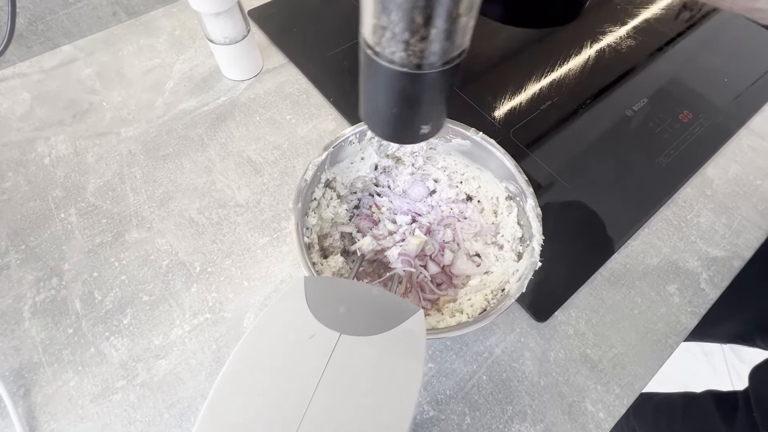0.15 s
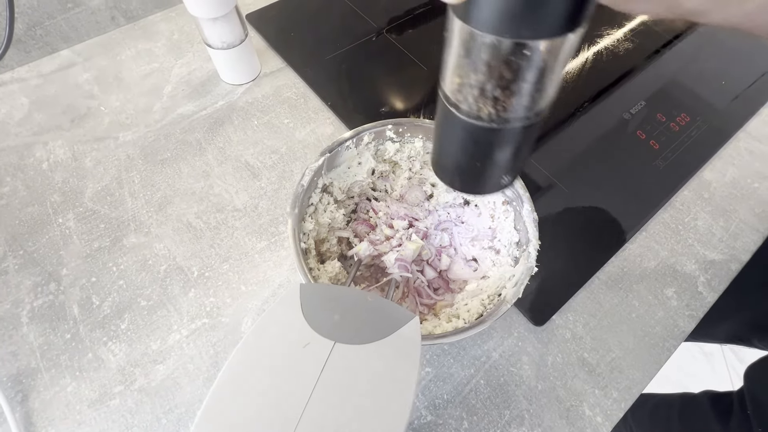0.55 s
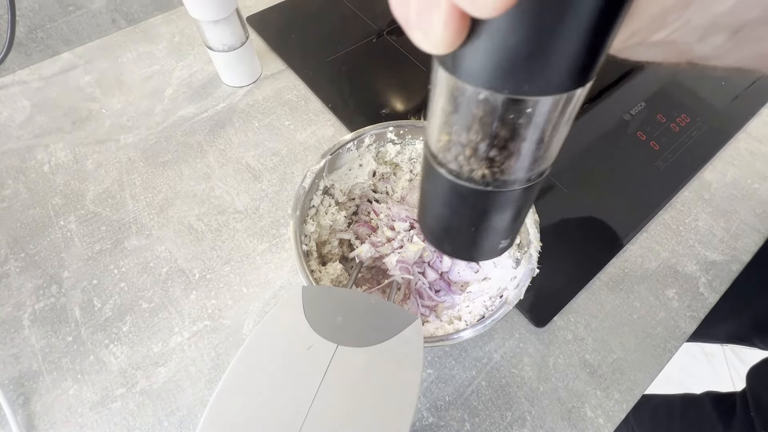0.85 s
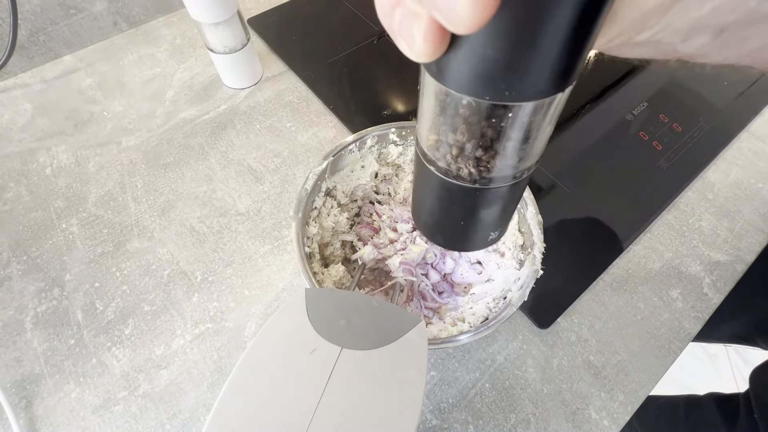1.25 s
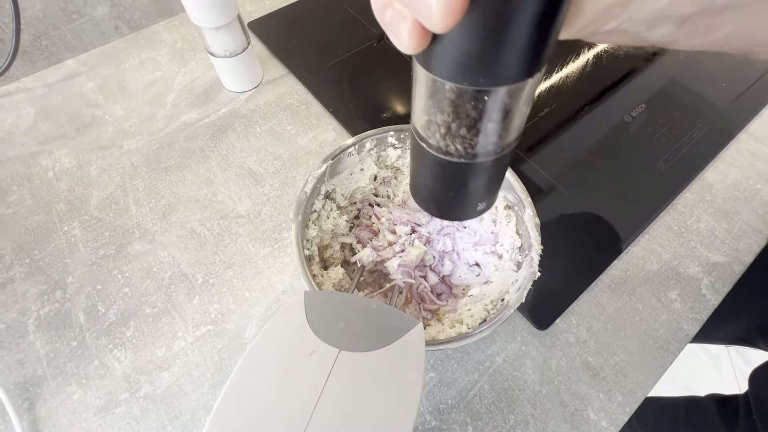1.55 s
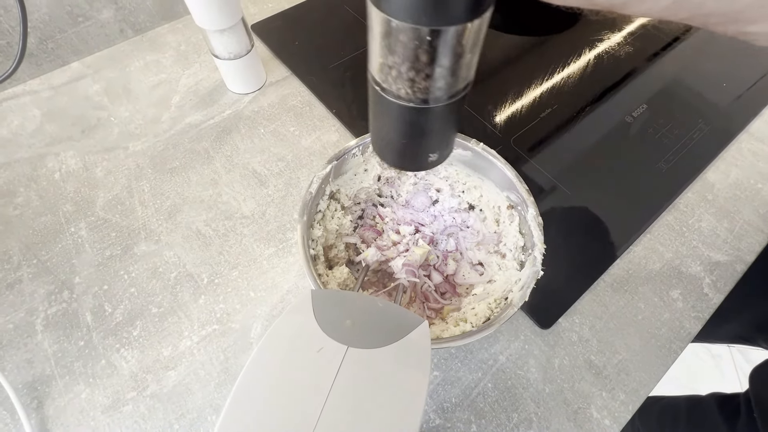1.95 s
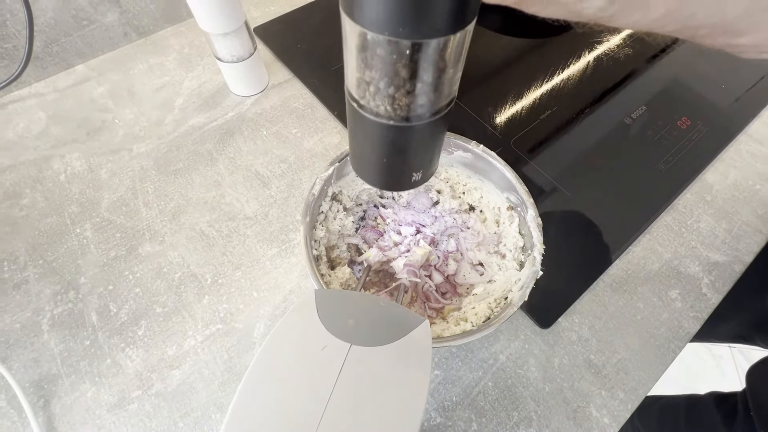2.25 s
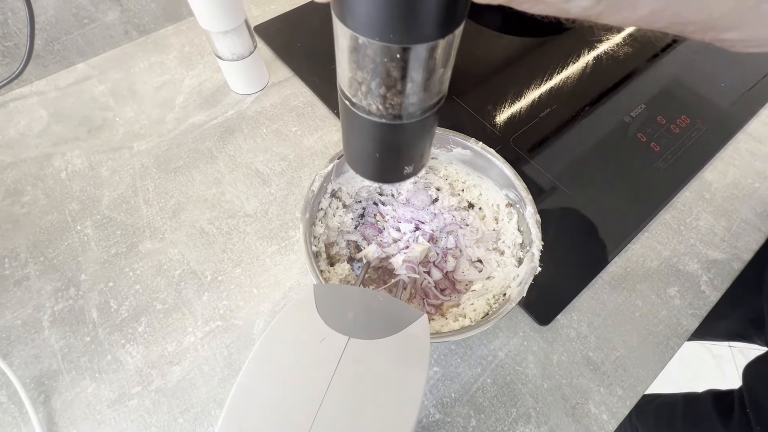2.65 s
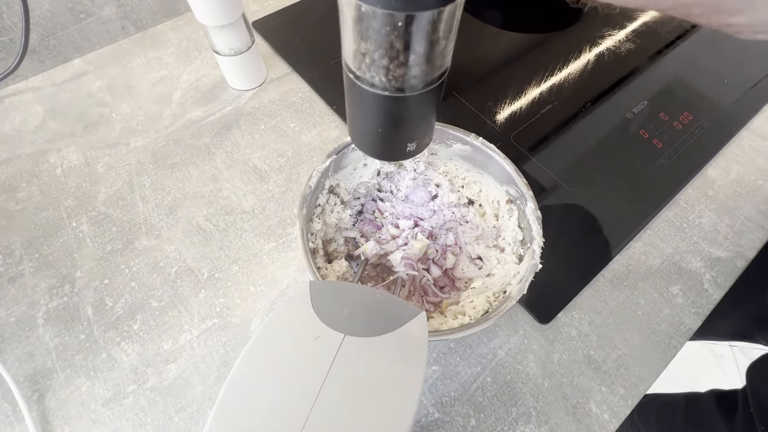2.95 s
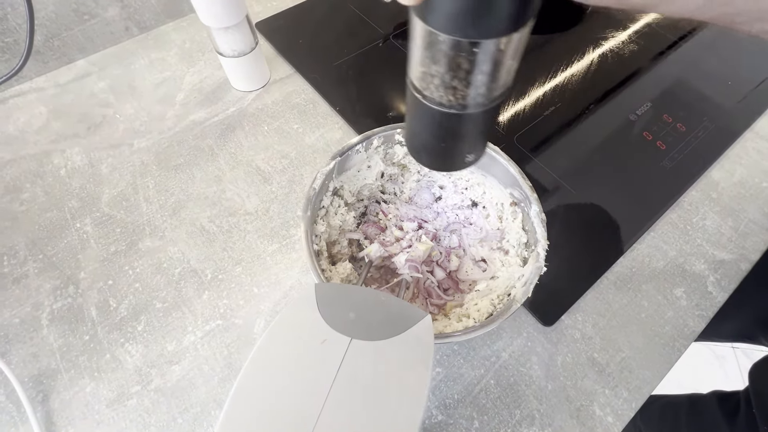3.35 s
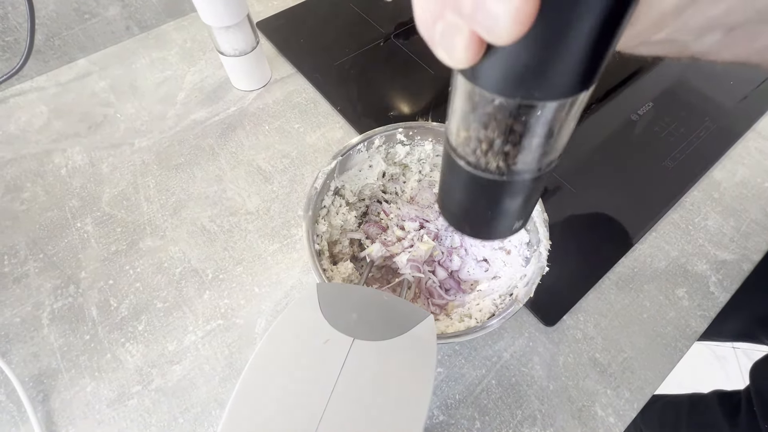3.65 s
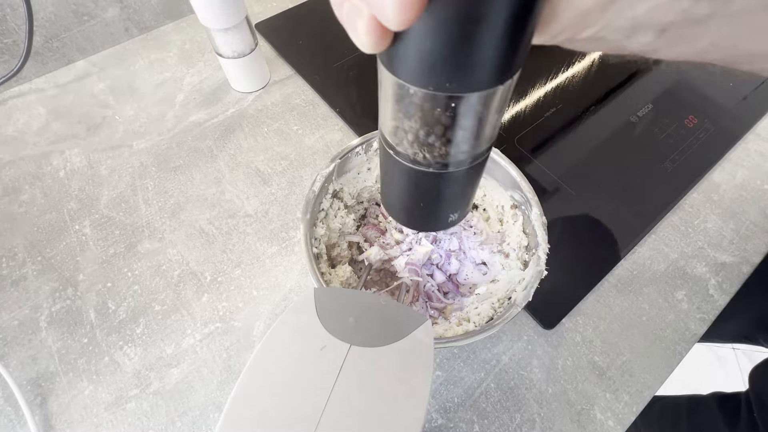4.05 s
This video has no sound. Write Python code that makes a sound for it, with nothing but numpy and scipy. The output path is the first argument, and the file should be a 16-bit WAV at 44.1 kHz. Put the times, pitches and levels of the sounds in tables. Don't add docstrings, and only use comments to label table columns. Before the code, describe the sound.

A battery pepper mill grinds close by, its motor whining and sagging under hard corns, with dry rattling hiss and sharp cracks.

```python
import sys
import numpy as np
from scipy import signal
from scipy.fft import rfft, irfft, next_fast_len
from scipy.io import wavfile
from scipy.ndimage import uniform_filter1d, map_coordinates

SR = 44100
rng = np.random.default_rng(int(sys.argv[2]) if len(sys.argv) > 2 else 0)


def to_linear_factor(level_db):
    exponent = np.asarray(level_db, float) / 20
    return 10 ** exponent


def transcribe(signal):
    frames = np.atleast_2d(signal).T
    limited = np.clip(frames, -1, 1)
    pcm = np.round(limited * 32767).astype(np.int16)
    wavfile.write(sys.argv[1], SR, pcm)


N = 185069

FREE_HZ = 185.7
GEAR_EDGE_S = .03


def unit(x):
    return x / np.sqrt(np.mean(x ** 2) + 1e-20)


def along(points, hz):
    f, v = np.transpose(points)
    return np.interp(np.log(hz + 1), np.log(f + 1), v)


def curves(rows):
    s, *cols = np.transpose(rows)
    return [np.interp(np.arange(N) / SR, s, c) for c in cols]


def wobble(rate):
    knots = rng.standard_normal(int(N * rate / SR) + 4)
    return map_coordinates(knots, [np.arange(N) * rate / SR])


def held(rows, edge_s):
    t = np.arange(N) / SR

    def ramp(u):
        return np.sin(np.pi / 2 * np.clip(u / edge_s + .5, 0, 1)) ** 2

    return sum(to_linear_factor(np.array(db)[:, None]) * ramp(t - s) * ramp(s + length - t) for s, length, *db in rows)


def filtered(x, response):
    m = next_fast_len(N + SR // 4)
    return irfft(rfft(x, m) * response(np.fft.rfftfreq(m, 1 / SR)), m)[..., :N]


def coloured(x, spectrum):
    return filtered(x, lambda hz: to_linear_factor(along(spectrum, hz)))


def modes(table):
    return lambda f: sum((-1) ** k * to_linear_factor(db) * 1j * f * w / (c * c - f * f + 1j * f * w)
                         for k, (c, w, db) in enumerate(table))


def passing(hz, mode):
    centre, width, db = mode
    return to_linear_factor(db) / (1 + ((hz - centre) / width) ** 2)


def steady(x):
    return x / np.sqrt(np.abs(uniform_filter1d(x[0] ** 2, size=7000)) + 1e-20)


def speed():
    # (lowest speed at [s], sag [Hz], squeeze [s], release [s])
    hard_corns = [(-.022, 39.7, .1, 0.38), (0.039, 2.16, 0.03, 0.035), (.265, 17.7, 0.063, 0.13),
                  (0.372, 4, 0.04, 0.063), (0.611, 18.6, .11, 0.17), (1.01, 12.6, .16, 0.38),
                  (1.286, 10.8, .041, .15), (1.57, 5.3, 0.029, 0.035), (1.639, 22.5, .12, 0.15),
                  (1.795, 11.1, 0.087, 0.087), (1.92, 15.8, 0.061, 0.38), (2.172, 36, .12, 0.099),
                  (2.446, 10.6, .1, 0.12), (2.68, 24.8, 0.093, 0.095), (2.9, 6, 0.37, 0.55),
                  (3.442, 20.6, .12, 0.048), (3.572, 12.3, .13, 0.17), (4.106, 9.6, .17, 0.23)]
    inertia_s = 0.069
    t = np.arange(N) / SR
    sag = sum(hz * np.exp(-((t - s) / np.where(t < s, squeeze, release)) ** 2)
              for s, hz, squeeze, release in hard_corns)
    return FREE_HZ - sag, sag + inertia_s * SR * np.gradient(sag)


def order(k, angle, gain, flutter_db):
    flutter = to_linear_factor(flutter_db * wobble(25.11))
    return np.sqrt(2) * gain * flutter * np.sin(k * angle + 2 * np.pi * rng.random())


def motor(angle, shaft_hz):
    # (multiple of shaft speed, level [dB])
    shaft_orders = [(2, -68), (4, -65), (8, -55), (9.54, -48.5), (10, -57), (12.72, -58)]
    # (frequency [Hz], level [dB per Hz])
    rumble_colour = [(150, -42), (210, -7.5), (300, -2.5), (420, -5.5), (600, -22)]
    sag = FREE_HZ - shaft_hz
    grip_db = -8.5 * np.clip(1 - np.arange(N) / SR / 0.77, 0, 1) ** .5
    drag_db = 0.61 * np.clip(168 - shaft_hz, 0, None)
    racing_db = .5 * np.clip(shaft_hz - 177, 0, None)
    unbalance = order(1, angle, to_linear_factor(-51.5 - 0.35 * sag + grip_db), .6)
    poles = order(3, angle, to_linear_factor(-48 - .44 * np.clip(sag - 10.7, 0, None)), 1.4)
    hum = sum(order(k, angle, to_linear_factor(db + (-drag_db if k > 2 else grip_db) - racing_db), 2.1)
              for k, db in shaft_orders)
    rumble_gain = to_linear_factor(0.17 * (shaft_hz - 168.5) - 61.0 + grip_db)
    rumble = rumble_gain * unit(coloured(rng.standard_normal(N), rumble_colour))
    return unbalance + poles + hum + rumble


def body_tones(angle, shaft_hz):
    # (frequency [Hz], width [Hz], level [dB])
    cap_mode = (905, 26, -48)
    collar_mode = (1395, 17, -49)
    wall_mode = (1920, 50, -51)
    cap = sum(order(k, angle, passing(k * shaft_hz, cap_mode) * to_linear_factor(1.5 * wobble(6)), 3.5) for k in (5, 6))
    collar = order(8, angle, passing(8 * shaft_hz, collar_mode), 3.5)
    wall = sum(order(k, angle, passing(k * shaft_hz, wall_mode), 4) for k in (10, 11, 12, 13))
    return cap + collar + wall


def pinion(angle, shaft_hz):
    # (start [s], length [s], level [dB])
    whine_notes = [(-.05, .3, -33), (.25, .11, -35), (.36, .07, -40), (.52, .12, -40), (.8, .11, -47),
                   (1.24, .05, -44), (1.54, .045, -38), (1.585, .17, -35), (1.755, .11, -49),
                   (1.87, .1, -39), (1.97, .05, -34.5), (2.02, .065, -28.5), (2.1, .15, -35.5),
                   (2.36, .1, -46), (2.52, .055, -44), (2.575, .04, -38), (2.615, .055, -33.5),
                   (2.67, .06, -36.5), (3.26, .06, -49), (3.362, .04, -36.5), (3.402, .042, -33.5)]
    # (start [s], length [s], 2nd overtone [dB], 3rd overtone [dB], 4th overtone [dB])
    jam_notes = [
        (-.05, .25, -56, -45, -50),
        (.2, .17, -56, -46, -48),
        (2.03, .07, -52, -50, -35),
        (2.1, .085, -38, -35, -31.5),
        (2.62, .06, -41, -58, -47),
        (3.365, .07, -43, -58, -50),
    ]
    # (frequency [Hz], width [Hz], level over the 4th [dB])
    rim_mode = (6750, 110, -3)
    idle_db = -53
    whine = order(9, angle, to_linear_factor(idle_db) + held(whine_notes, GEAR_EDGE_S)[0], 1.1)
    second, third, fourth = held(jam_notes, GEAR_EDGE_S)
    fifth = fourth * passing(45 * shaft_hz, rim_mode)
    overtones = ((18, second), (27, third), (36, fourth), (45, fifth))
    return whine + sum(order(k, angle, gain, 1.5) for k, gain in overtones)


def planet_gears(angle):
    # (start [s], length [s], level [dB])
    tight_meshes = [(.42, .12, -50), (.58, .14, -52), (.85, .33, -53), (1.3, .25, -49), (1.57, .2, -51),
                    (1.8, .25, -49), (2.33, .13, -42), (2.48, .15, -46), (3.5, .13, -54)]
    return order(6.36, angle, to_linear_factor(-60) + held(tight_meshes, GEAR_EDGE_S)[0], 3.5)


def flaws(angle):
    count = 128
    place, knots = angle * count / (2 * np.pi), np.arange(count)
    a, b, c, d = (np.interp(place, knots, row, period=count) for row in rng.standard_normal((4, count)))
    turn = 1.5 * wobble(5)
    return unit(np.array([a, b]) * np.cos(turn) + np.array([c, d]) * np.sin(turn))


def grit(load, per_s, share, angle):
    flaw_share = .055
    impacts = unit(rng.standard_normal((2, N)) * (rng.random((2, N)) < per_s / SR))
    share = np.clip(share, 0, 1 - flaw_share)
    friction = np.sqrt(1 - flaw_share - share) * rng.standard_normal((2, N))
    smooth = friction + np.sqrt(flaw_share) * flaws(angle)
    return load * to_linear_factor(0.67 * wobble(20) + 0.53 * wobble(60)) * (np.sqrt(share) * impacts + smooth)


def patchy(x, depth_db, peaks=()):
    hz, s, z = signal.stft(x, SR, nperseg=512)
    field = uniform_filter1d(rng.standard_normal(z.shape[1:]), size=4, axis=0)
    field = uniform_filter1d(field, size=36, axis=1)
    frame = np.minimum((s * SR).astype(int), N - 1)
    lift = 1 + sum(to_linear_factor(db[frame]) / (1 + ((hz[:, None] - centre[frame]) / width) ** 2)
                   for centre, width, db in peaks)
    return signal.istft(z * lift * to_linear_factor(depth_db * unit(field)), nperseg=512)[1][:, :N]


def ringing(x, spectrum):
    # (frequency [Hz], width [Hz], lift [dB])
    narrow_modes = [(2000, 48, -9.5), (2310, 125, -10), (3350, 54, -8), (3830, 51, -10), (6700, 41, -2),
                    (7330, 90, -13), (7430, 100, -6), (8110, 71, 0), (8890, 160, -2), (9780, 130, -0.5),
                    (10700, 350, -10)]

    def ridges(f):
        return 1 + sum(to_linear_factor(db) / (1 + ((f - hz) / width) ** 2) for hz, width, db in narrow_modes)

    return steady(filtered(x, lambda f: to_linear_factor(along(spectrum, f)) * ridges(f)))


def grind(angle, shaft_hz, torque):
    load_beats = [(.265, .08), (1, .14), (3, .12), (6.36, .13), (9, .1)]
    # (time [s], level [dB])
    corn_feed = [(0.0, -36.5), (0.24, -37.5), (0.38, -43.5), (1.52, -38.5), (1.54, -38.5), (1.82, -41),
                 (2.1, -37.5), (2.3, -43.5), (2.65, -37.5), (2.76, -43.5), (3.22, -43), (3.41, -38),
                 (3.53, -44), (3.58, -40), (3.75, -46.5), (4.01, -37.5), (4.17, -41), (4.2, -38)]
    # (start [s], length [s], extra level [dB])
    hard_bites = [(.52, 0.068, -9), (.83, 0.28, -10), (1.21, 0.071, -8), (1.54, 0.028, -14),
                  (2.05, .14, -21), (2.38, 0.067, -4.5), (2.53, 0.16, -15), (3.28, 0.052, -29)]
    # (time [s], lower ring [Hz], upper over lower [dB], high over low hiss [dB], rim ring [dB])
    hand_path = [(0, 5350, -1, -17, 0), (.3, 5460, 7, -13, 0), (.45, 5160, -6, -8, 2),
                 (.62, 5520, 13, 10, 0), (.8, 4582, -11, 11, -15), (1, 4752, -6, 4, -15),
                 (1.25, 5006, -2, 11, -12), (1.45, 5195, -12, 11, -10), (1.68, 5360, -8, -1, 1),
                 (1.9, 5300, -9, -5, 7), (2.2, 5090, -12, -4, 3.5), (2.6, 5000, 2, -3, 1),
                 (3.0, 5071, -9, -4, -7), (3.3, 5208, -8, 1, 5), (3.55, 4956, -12, 19, 0),
                 (3.85, 4950, -20, 7, -15), (4.05, 5000, -29, -4, -3)]
    # (frequency [Hz], level [dB per Hz])
    housing_colour = [(240, -86), (400, -13.5), (513, -12.5), (581, -9.5), (669, -4), (802, -1.5),
                      (987, -5.5), (1390, 4), (1540, 0), (1880, 5), (2630, -24.5), (2900, -12), (3770, -21),
                      (6380, -120)]
    shell_colour = [(1350, -102), (2300, -4), (2660, -8.5), (2960, -5.5), (3570, -4), (4600, -0.5),
                    (5980, -7.5), (10100, -120)]
    hopper_colour = [(2290, -37), (3900, -3), (5080, 3), (5900, 1.5), (6500, -3.5), (6720, -7), (6850, -38),
                     (7200, -16.5), (9360, -49), (15800, -120)]
    burr_colour = [(6500, -52), (6900, 0.5), (7100, -5.5), (8300, 0.5), (9090, 1.5), (11100, -0.5),
                   (11700, -1.5), (13000, -1), (14500, -5.5), (15050, -6.5), (15700, -29)]

    bite_db = 20 * np.log10(1 + held(hard_bites, GEAR_EDGE_S)[0])
    press_db = curves(corn_feed)[0] + 40 + 0.13 * (torque - 17) + bite_db
    lower_hz, upper_db, hiss_db, rim_db = curves(hand_path)
    upper_hz = 5900 + 0.089 * (lower_hz - lower_hz.mean())
    pulse = np.exp(sum(depth * np.sin(k * angle) for k, depth in load_beats))
    stutter_db = .6 * wobble(350)
    load = pulse * to_linear_factor(0.36 * wobble(16) + 0.23 * wobble(70) + stutter_db)
    teeth = patchy(grit(load, 900, share=0.12, angle=angle), depth_db=1.3)
    # (Hz, width Hz, dB)
    peaks = [(lower_hz, 700, 7.0 - upper_db / 2),
             (upper_hz, 400, 7.0 + upper_db / 2),
             (np.full(N, 9250), 450, -8.5 - hiss_db / 2),
             (np.full(N, 11000), 450, hiss_db / 2),
             (np.full(N, 6440), 300, rim_db + 11.0)]
    crumbs = patchy(grit(load, 2500, share=0.05, angle=angle), depth_db=2.5, peaks=peaks)

    stall_db = 0.19 * np.clip(163 - shaft_hz, 0, None)
    housing = to_linear_factor(-37.0 + 0.31 * press_db - stall_db) * ringing(teeth, housing_colour)
    shell = to_linear_factor(-37.0 + 0.26 * press_db - 0.052 * upper_db) * ringing(teeth, shell_colour)
    hopper = to_linear_factor(-30.5 + 0.49 * press_db + 0.075 * upper_db) * ringing(crumbs, hopper_colour)
    burr = to_linear_factor(-39.0 + 0.79 * press_db) * ringing(crumbs, burr_colour)
    return housing + shell + hopper + burr


def scrapes():
    # (start [s], length [s], frequency [Hz], level [dB])
    scrape_notes = [(0, 0.044, 890, -41), (0.098, .19, 905, -52), (.11, .09, 1980, -50),
                    (0.441, .3, 1850, -42.5), (.62, 0.054, 2000, -40), (1.54, 0.029, 6086, -29),
                    (1.62, 0.097, 6270, -33.5), (2.046, 0.024, 5900, -34), (2.11, 0.1, 5944, -29.5),
                    (2.197, 0.14, 5895, -33), (2.382, 0.34, 5900, -40), (2.754, 0.51, 5950, -38),
                    (2.869, 0.0699, 2300, -45), (3.264, 0.081, 5227, -30.5), (3.891, .2, 1745, -41),
                    (4.131, .05, 1765, -47), (3.986, 0.17, 5108, -35)]
    width_hz, full_width_at_hz = 220, 6500
    a, b, n = wobble(width_hz), wobble(width_hz), np.arange(N)
    out = np.zeros(N)
    for s, length, hz, db in scrape_notes:
        place = n * (hz / full_width_at_hz) ** .7
        phase = 2 * np.pi * hz * n / SR
        ring = np.interp(place, n, a) * np.cos(phase) + np.interp(place, n, b) * np.sin(phase)
        out += held([(s, length, db)], 0.05)[0] * ring
    return out


def kitchen_hum():
    # (frequency [Hz], level [dB per Hz])
    room_colour = [(12, -47), (20, -49), (57, 5), (86, -7), (150, 3.5), (304, -11), (348, -36), (400, 3.5),
                   (520, 3.5), (880, -120)]
    return to_linear_factor(-64.5) * unit(coloured(rng.standard_normal((2, N)), room_colour))


def ring_gear(angle):
    # (start [s], length [s], level [dB])
    drum_notes = [
        (.45, .06, -48),
        (.65, 0.065, -45),
        (2.5, .13, -46),
        (3.25, 0.082, -44),
    ]
    return order(8, angle, held(drum_notes, GEAR_EDGE_S)[0], 2)


def cracks():
    # (time [s], peak [dB], knock [dB])
    corn_splits = [(.55, -14, -34), (1.257, -21, -32), (1.277, -24.5, 9), (1.393, -29, 9.5),
                   (1.462, -26, -25), (1.555, -13, -18), (1.625, -20, -25), (2.057, -13, -30),
                   (2.065, -14, -25), (2.161, -14, -25), (2.169, -9.5, -25), (2.191, -16, -30),
                   (2.212, -17, -25), (2.64, -23, -26), (2.715, -28, 2), (2.911, -24, -25),
                   (3.013, -19, -25), (3.296, -24, -25), (3.31, -24, -28), (3.397, -32, 8),
                   (3.4275, -3, -18.5), (3.432, -17, -25), (3.589, -27, -5), (3.813, -34, -25),
                   (3.953, -14, -11), (4.076, -20, -25)]
    # (frequency [Hz], width [Hz], level [dB])
    corn_modes = [(1930, 360, 7), (5200, 1300, 2), (8800, 3200, -8)]
    splinter_mode = (11500, 7000, -17)
    knock_modes = [(485, 160, -2.5), (794.8, 180, 2), (1130, 560, -3)]
    snaps, blows, t = np.zeros(N + SR), np.zeros(N), np.arange(SR // 40) / SR
    decay = to_linear_factor(-60 * t / .009) + .15 * to_linear_factor(-60 * t / .05)
    onset = 1 - np.exp(-t / .0004)
    bursts = rng.standard_normal((len(corn_splits), len(t))) * decay * onset
    bursts[:, 30:32] += [4.5, -4.5]
    for (s, db, knock_db), burst in zip(corn_splits, bursts):
        snaps[round(s * SR):][:len(t)] += to_linear_factor(db - 3.5) * burst
        blows[round(s * SR)] = to_linear_factor(db + knock_db + 27.0)
    splinters = filtered(snaps[:N], modes(corn_modes + [splinter_mode]))
    return splinters + filtered(blows, lambda f: modes(knock_modes)(f) * (1j * f / (400 + 1j * f)) ** 2)


def ports(pair):
    # (frequency [Hz], left-right likeness [0-1])
    port_likeness = [(60, 0.86), (200, 0.62), (450, 0.5), (770, 0.65), (1100, 0.23), (1400, 0.83),
                     (1650, 0.59), (2000, 0.89), (2500, 0.46), (3400, 0.8), (4600, 0.6), (5900, 0.65),
                     (6900, 0.29), (9500, 0.94), (15000, 0.69)]
    # (frequency [Hz], left minus right [dB])
    port_balance = [(60, -.2), (550, .1), (780, 4.8), (1100, 4.3), (1350, 7.5), (2000, .7), (2500, 3),
                    (3300, .7), (4300, -.6), (5500, 2), (7300, -.1), (8900, -1.8), (11000, .1),
                    (15000, 1.2)]
    # (frequency [Hz], left leads by [rad])
    port_lead = [(60, .06), (600, .01), (900, 1.05), (1290, -.3), (1550, .22), (1850, -.2), (2900, .45),
                 (3400, .03), (4650, .4), (5900, -.7), (7300, -1.4), (9300, -.8), (14500, -1.4)]

    def blend(hz):
        turn = np.arccos(np.clip(along(port_likeness, hz), -1, 1)) / 2
        return np.array([np.cos(turn), np.sin(turn)])

    def sides(hz):
        tilt = to_linear_factor(along(port_balance, hz) / 2) * np.exp(.5j * along(port_lead, hz))
        whole = 2 / np.abs(tilt + 1 / tilt + 0.12)
        return whole * np.array([tilt, 1 / tilt])

    a, b = filtered(pair, blend)
    return filtered(np.array([a + b, a - b]), sides)


def scene():
    shaft_hz, torque = speed()
    angle = 2 * np.pi * np.cumsum(shaft_hz * (1 + 0.001 * wobble(39.73))) / SR
    tones = motor(angle, shaft_hz) + body_tones(angle, shaft_hz)
    gears = pinion(angle, shaft_hz) + planet_gears(angle) + ring_gear(angle)
    direct = tones + gears + scrapes() + cracks()
    reflections = unit(rng.standard_normal(size=1300)) / np.sqrt(1300)
    echo = signal.fftconvolve(direct, reflections)[:N]
    return ports(np.array([direct, 0.34 * echo]) + grind(angle, shaft_hz, torque) + kitchen_hum())


def band_limit(x):
    return signal.sosfilt(signal.butter(12, 15720, fs=SR, output="sos"), x)


def record(dry):
    return band_limit(dry)


dry = scene()
out = record(dry)
transcribe(out)
```